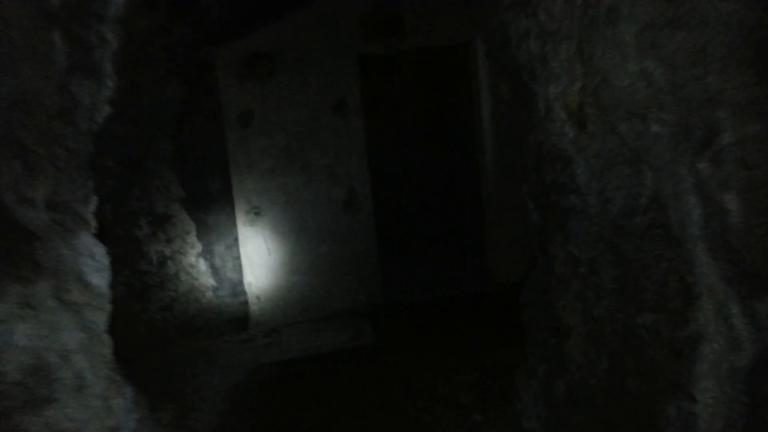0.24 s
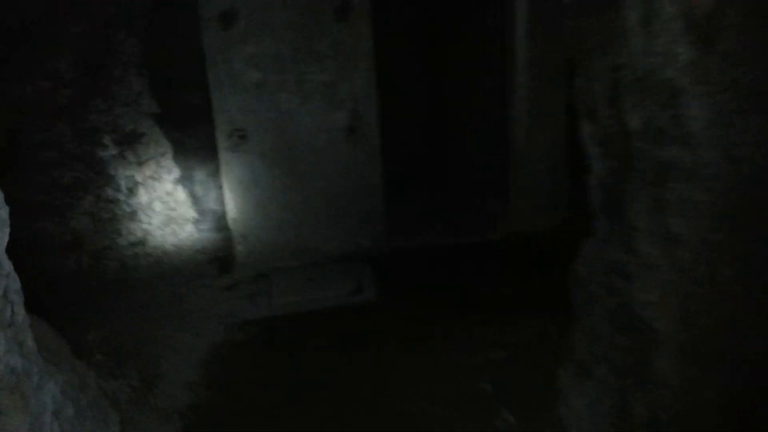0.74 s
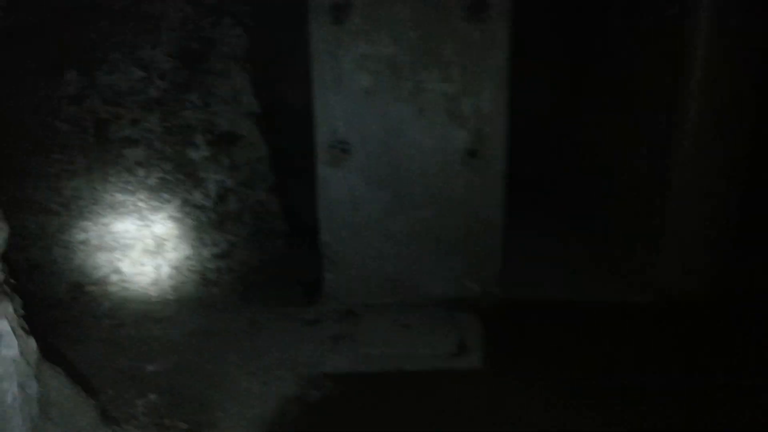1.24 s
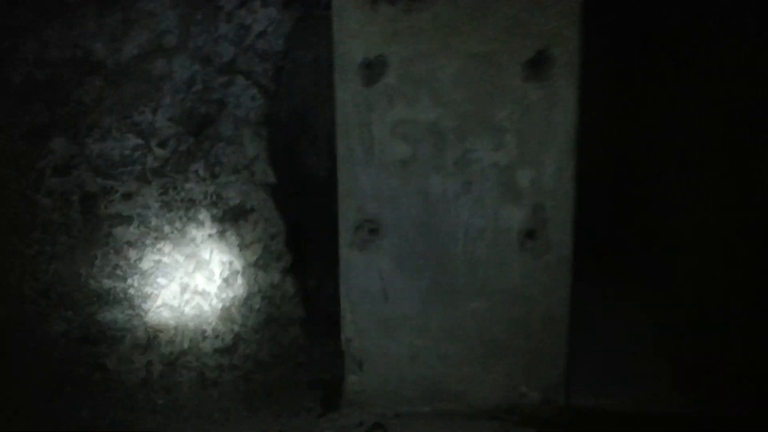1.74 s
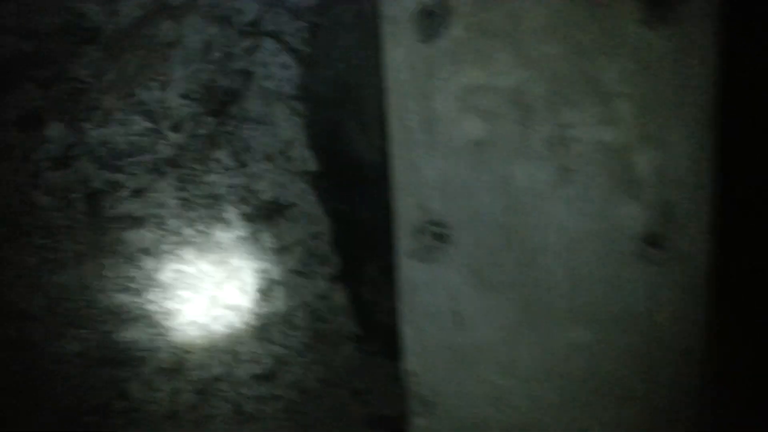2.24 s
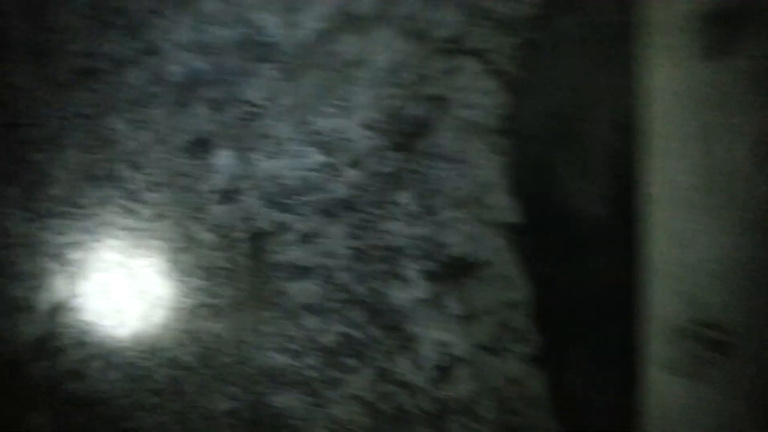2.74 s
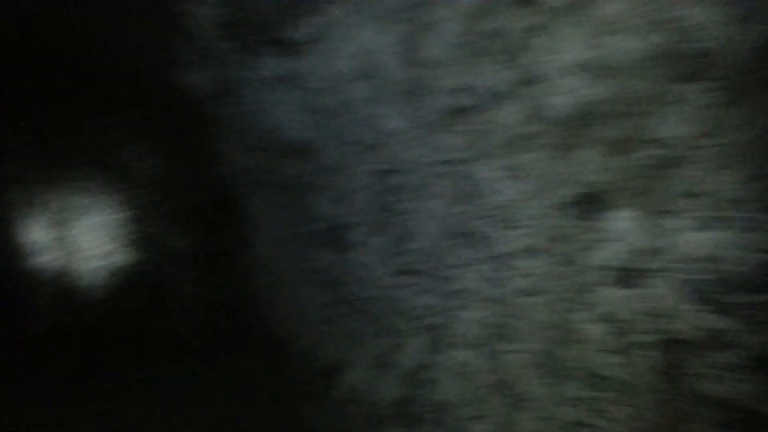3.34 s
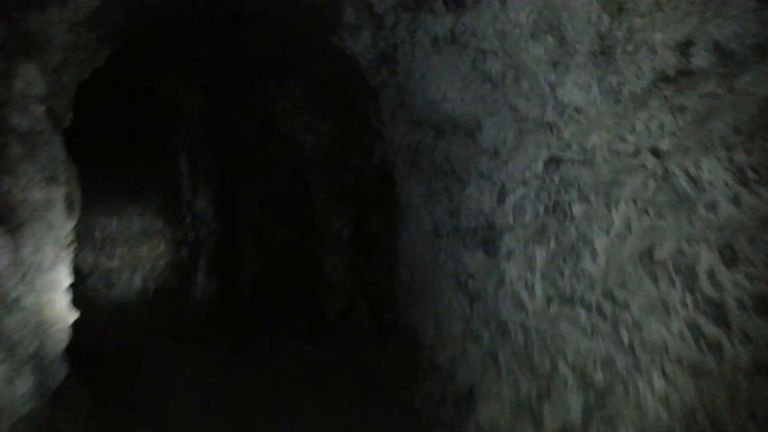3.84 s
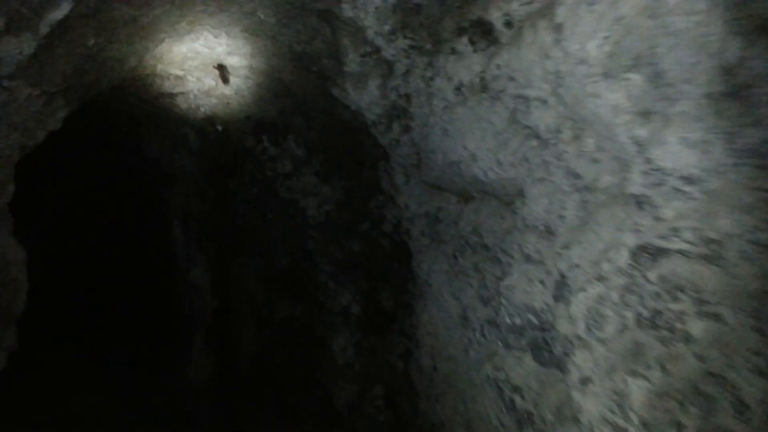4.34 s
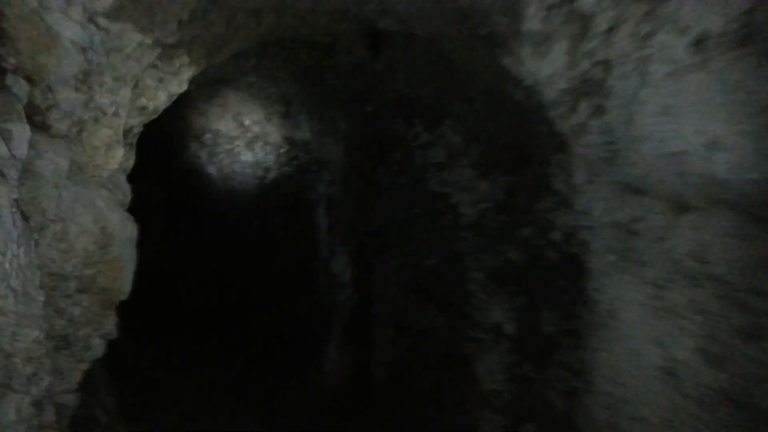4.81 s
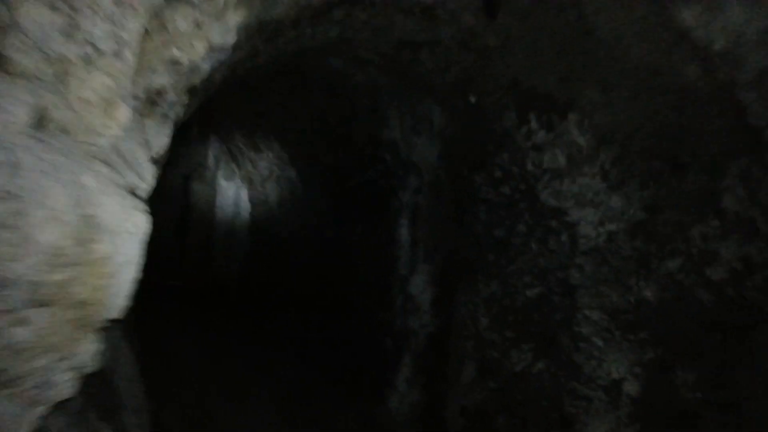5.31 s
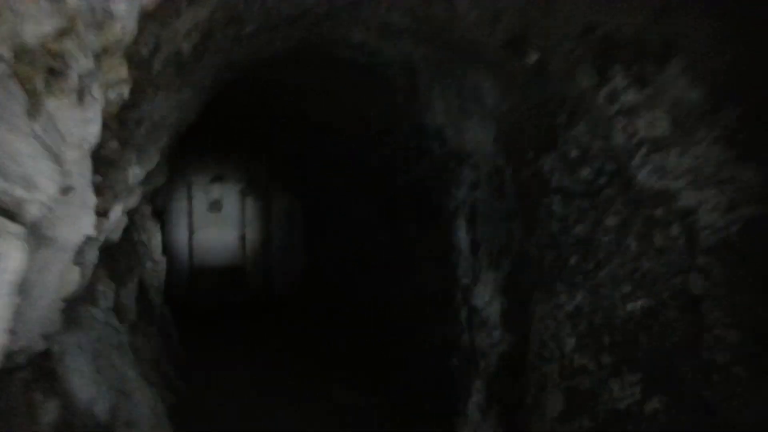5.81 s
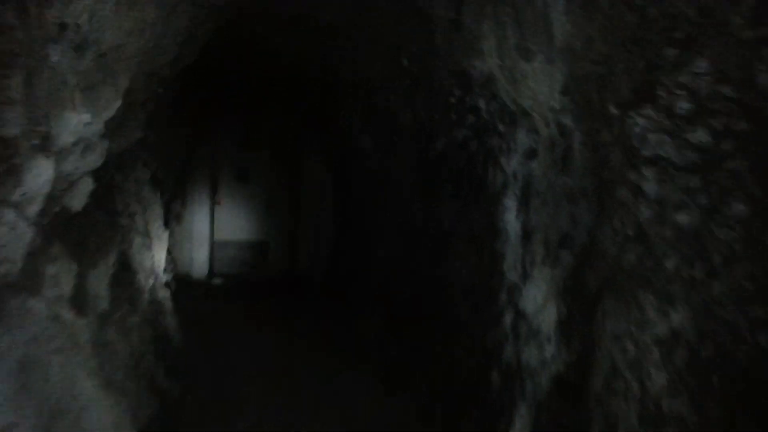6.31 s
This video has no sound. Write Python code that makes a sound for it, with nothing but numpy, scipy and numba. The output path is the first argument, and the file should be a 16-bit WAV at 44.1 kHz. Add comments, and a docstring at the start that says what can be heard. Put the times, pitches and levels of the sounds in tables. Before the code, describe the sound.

Close footsteps crunch over loose stones in a narrow rock tunnel, with heel thuds, sharp pebble knocks and a short dense echo over steady hiss.

```python
"""Footsteps on loose stone, close by: each sole presses rubble, gravel, grit and sand, which crack as dense grains.
Stones and often the heel knock short and hard, heels thud on the rock floor, stray pebbles tick at random.
The place is a narrow rock tunnel: a short dense echo, a longer tail and the hum of its cross modes.
The walker holds a small stereo camera microphone, which adds its colour, hiss, a faint rumble
and two dry handling ticks."""
import sys
import numpy as np
from scipy import signal
from scipy.fft import rfft, irfft, next_fast_len
from scipy.io import wavfile
from numba import njit

SR = 44100
rng = np.random.default_rng(int(sys.argv[2]) if len(sys.argv) > 2 else 0)


def unload_audio(sound):
    """Save the sound as a 16-bit wav file, at the path given as the first command line argument."""
    columns = np.transpose(np.atleast_2d(sound))
    # keep every value between -1 and 1, then stretch to whole-number steps
    steps = np.round(np.clip(columns, -1, 1) * 32767)
    wavfile.write(sys.argv[1], SR, steps.astype(np.int16))


def ratio(d):
    """dB to gain"""
    e = np.asarray(d, float) / 20
    return 10 ** e


N = 289556  # length in samples

# Microphone hiss spectrum before scaling. Each row: frequency in Hz, relative level in dB per Hz.
HISS_SPECTRUM = [(18, -31), (30, -25), (129, 0.5), (312, 4.5), (472, 3.5), (978, -1), (1270, -2.5),
                 (1370, -2.5), (2250, -9), (2840, -3.5), (7630, -16.5), (13500, -18.5), (15000, -23)]
# Colour of the microphone and its body. Each row: frequency in Hz, gain in dB.
MIC_COLOUR = [(30, -36), (110, -10.5), (160, -11.5), (215, -3.1), (450, 6.5), (800, 1.23), (1250, 2),
              (1700, 7.5), (2150, 2.5), (2700, 9.5), (4800, 8.5), (6200, 6), (9000, 3), (12000, 1),
              (14500, -0.5)]
# Mismatch of the two ports. Each row: frequency in Hz, left minus right in dB.
PORT_BALANCE = [(60, -2), (110, 6), (200, 1), (380, 2.5), (700, 0), (1290, 5), (2380, 4), (4400, 2.5),
                (8120, 0), (15000, 4)]
# Decay of the tunnel tail. Each row: frequency in Hz, time to fall 60 dB in seconds.
TAIL_DECAY = [(150, 1), (400, 0.83), (1000, 0.64), (2800, 0.68), (7000, 0.45), (14000, 0.5)]
# Air modes across the tunnel. Each row: mean frequency in Hz, mean level in dB before the tail is scaled,
# time to fall 60 dB in seconds.
CROSS_MODES = [(168, -18.5, 0.49), (215.2, -29.5, 1), (346, -19, 0.62), (443.5, -22.5, 0.2)]

# Stone sizes. Each row: grains per second, lowest pitch in Hz, highest pitch in Hz,
# cycles to fall 20 dB, mean of the random level boost in dB (before its cap).
PEBBLE_GRAINS = (14, 590, 3570, 2.8, 8.2)  # stray pebbles
GRAVEL_GRAINS = (1500, 712, 2303, 5.1, 1.18)
RUBBLE_GRAINS = (1000, 171, 930, 2.5, 4.26)
GRIT_GRAINS = (3000, 1980, 4770, 2.83, 2.2)
SAND_GRAINS = (8000, 6200, 10400, 2, 3.6)

# Heel blows on the rock floor. Each row: start in seconds, level in dB before HEEL_DB,
# pitch in Hz, cycles to fall 20 dB.
HEEL_BLOWS = [(0.332, -17.5, 536, 3.3), (0.862, -18, 436, 12), (1.375, -5.5, 238, 4.7),
              (1.429, 1.5, 232.5, 6.3), (1.812, -14, 229, 4.2), (2.034, -32, 490, 3.7),
              (2.17, -17, 497, 4.3), (2.748, -27, 595, 7.8), (3.239, -35, 315, 10), (3.322, -26, 576, 2.8),
              (3.437, -26, 500, 4.7), (3.845, -27, 440, 4.4), (4.429, -38, 727, 4),
              (4.958, -29.5, 590, 6.9), (5.008, -33, 372, 3.8), (5.208, -23, 251, 20),
              (5.784, -25, 533, 6.6), (6.416, -20, 475, 5.1), (6.449, -17, 500, 5.3)]
# Short hard knocks of stones and, near 710-775 Hz, often of the heel; the two at 4.298 and 5.011 s are
# dry handling ticks close to the microphone. Each row: start in seconds, level in dB, pitch in Hz,
# snap level in dB re the knock, extra level in dB sent to the walls.
HARD_KNOCKS = [(0.189, -22.5, 870, -7.5, 10.5), (0.331, -26, 773, -23, 7), (0.411, -24.5, 740, -13, 10),
               (0.451, -23, 1780, -15, 13), (0.914, -21, 710, -11, 17), (0.976, -8, 1150, -35, 9),
               (1.196, -16, 1950, -15.5, 4), (1.377, -4, 735, -25, 1), (1.413, -20, 1020, -22, 20.5),
               (1.431, 2, 770, -41, -3), (1.491, -16, 710, -13, -9), (1.566, -17.5, 2010, -8, 10.5),
               (1.616, -9.5, 1960, -13, 9), (1.6796, -0.5, 1830, -32, 5), (1.81, -21.5, 2950, -7, 0),
               (2.002, -18, 1800, -39, 12), (2.071, -21.5, 745, -2.5, 12), (2.178, -11.5, 1030, -20, 7.5),
               (2.752, -29.5, 2680, -4, 1.5), (2.788, -19.5, 1790, -16, 5), (2.834, -23.5, 1580, -6.5, 9.5),
               (2.927, -16, 1770, -31, -3), (3.235, -33, 713, -34, 8), (3.324, -28, 727, -18, 9),
               (3.443, -22.5, 1310, -18, 13.5), (3.813, -21.5, 1140, -18.5, 13.5),
               (3.834, -13, 775, -22, 11.5), (3.906, -12, 1090, -27, 6), (4.001, -8.5, 980, -38, 6),
               (4.044, -10.5, 956, -26, 3), (4.298, -19.5, 1850, -20, -3), (4.43, -17, 1080, -20, 13.5),
               (4.556, -24.5, 1090, -18, 7), (4.638, -30.5, 2640, 0, 2), (4.963, -30.5, 836, -28, 10),
               (5.011, -24, 840, -16, -1), (5.115, -30, 1850, -10, 8), (5.209, -28, 880, -16, 1.5),
               (5.781, -22.5, 1750, -4, 10.5), (6.054, -17.5, 1810, -40, -3), (6.315, -36, 900, -17, 12),
               (6.423, -14, 1310, -16, -5), (6.46, -5.5, 1580, -27, -16), (6.517, -22.5, 1640, -14, 15)]
# Modes of a hard knock's contact snap. Each row: frequency in Hz, gain in dB, cycles to fall 20 dB.
SNAP_MODES = [(3150, 8.5, 1.94), (4130, 4, 2.3)]
# A sole lands and presses on. Each row: start in seconds, hold in seconds, gravel level in dB,
# rubble in dB re gravel, sand in dB re gravel; the levels are before TREAD_DB.
SOLE_LANDINGS = [(-0.1, 0.12, -33, 0.5, -19), (0.322, .025, -32.5, -3, -18), (0.852, 0.083, -22.5, 5.5, -7),
                 (1.186, 0.027, -38, 1, -19), (1.365, 0.022, -28.5, 14, -12), (1.437, 0.013, -30, 11, -5),
                 (1.687, .08, -35.5, -6, -25), (2.0, 0.034, -40, -7, -21),
                 (2.744, 0.13, -37.5, -4.5, -13.5), (3.329, 0.066, -36, -3.5, -16),
                 (3.831, 0.084, -33, 5, -8.5), (4.424, 0.033, -38, -6.5, -35), (5.199, 0.024, -41, 8, -18),
                 (5.774, 0.075, -36, -2, -12.5), (6.037, 0.011, -44.5, -14, -13),
                 (6.412, 0.017, -32, -2.5, -15), (6.451, .02, -24.5, -3.5, -19.5)]
# A sole scuffs or rolls off. Each row: peak in seconds, swell in seconds, gravel level in dB,
# rubble in dB re gravel, sand in dB re gravel; the levels are before TREAD_DB.
SOLE_SCUFFS = [(0.12, .08, -37.5, 3, -20.5), (0.191, 0.052, -34, -2, -10.5), (0.27, 0.069, -33.5, -7, -21),
               (0.415, 0.072, -36.5, 0.5, -11), (0.48, 0.085, -35, 2.5, -12),
               (0.55, 0.24, -41.5, 2.5, -11.5), (0.64, 0.035, -46, 8, -10), (1.04, 0.065, -31, -1, -20),
               (1.1, .04, -38, -1, -9.5), (1.16, 0.074, -42.5, 8, -11), (1.55, 0.071, -30, -16, -17),
               (1.631, 0.11, -30, 0.5, -9), (1.82, 0.046, -43.5, 11, 2), (1.965, 0.036, -41, -9, -12.5),
               (2.064, 0.05, -25, -3, -6.5), (2.13, 0.11, -29.5, -3, -12), (2.19, 0.045, -28, -3, -38),
               (2.27, 0.29, -31.5, -4, -15), (2.664, 0.072, -38.5, -15, -11.5), (2.7, .05, -44, -5, -6),
               (2.84, .04, -35, -4, -23), (2.925, 0.052, -40, -3.5, -14), (3.241, 0.021, -44.5, 1.5, -20),
               (3.45, 0.032, -37, 3, -14), (3.68, .04, -52.5, -2, -15), (4.018, 0.13, -26, 2.5, -16),
               (4.126, 0.18, -37.5, 0.5, -7.5), (4.351, 0.11, -43, 2, -6), (4.554, 0.041, -47, -5, -22),
               (4.645, 0.12, -38, 0, -17), (4.738, 0.2, -34.5, -1.5, -11.5), (4.969, 0.026, -58, 16, 5.5),
               (5.124, 0.1, -45.5, -3, -14), (5.27, 0.096, -34, 1.5, -10.5), (5.33, 0.085, -41.5, 6, -13),
               (5.77, 0.12, -47, 1, -15), (5.875, 0.044, -33.5, 1.5, -11.5), (5.929, 0.095, -36.5, -1, -13),
               (6.17, 0.026, -55, 5, 4.5), (6.32, .04, -51, 6, -7), (6.405, .05, -44, -3, -9),
               (6.515, .04, -34.5, 5, -15)]
# How gravel, rubble, grit and sand, in this order, fall quiet after a press [amplitude, dB per second].
SETTLE_RATES = (180, 139, 201, 242)

HISS_DB, RUMBLE_DB = -45.5, -75  # rms at the capsules
EARLY_DB, EARLY_T60_S, WALL_S = -0.7, 0.1, 0.002  # nothing returns before WALL_S
TAIL_DB, TAIL_BUILD_S = -4.5, 0.08  # tail level before its gradual build-up
ALIKE_HZ = 626  # above this the two ports hear unrelated echoes
STRIDE_S = 0.45
LARGEST_DB = 12  # cap on a grain's random level boost
PORT_LAG_S = 0.00025  # largest lag between the ports
PEBBLE_DB, HEEL_DB, TREAD_DB = -65, -5, -4  # levels on the floor, which also drive the echo
KNOCK_CYCLES = 2.26  # cycles in which a hard knock falls 20 dB
OVERTONE, OVERTONE_DB = 1.385, -7.5  # a hard knock's second mode re its first
LANDING_RISE_S, SWELL_DB = 0.0042, 17  # a scuff climbs SWELL_DB in its swell time
GRIT_DB, GRIT_SHARE = 0, 0.41  # grit dB re gravel = GRIT_DB + GRIT_SHARE * sand dB
SLIP_HZ, SLIP_DB = 163, 1.24  # fastest stick-slip of the sole, rms swing of its level
TOP_HZ = 14600


def colour(x, points):
    """Weights the spectrum by (Hz, dB) points."""
    size = next_fast_len(x.shape[-1])
    hz, db = np.transpose(points)
    bins_hz = np.arange(size // 2 + 1) * SR / size
    gain = ratio(np.interp(np.log(bins_hz + 1), np.log(hz), db))
    return irfft(rfft(x, size) * gain, size)[..., :x.shape[-1]]


def unit(x):
    """Scales to rms 1."""
    return x / np.sqrt(np.mean(x ** 2))


def filtered(x, order, hz, kind):
    """Butterworth filter of the given kind."""
    return signal.sosfilt(signal.butter(order, hz, kind, fs=SR, output="sos"), x)


def wide_noise(size, alike_hz):
    """Two-channel noise, the same in the bass and unrelated in the treble."""
    mid, side = rng.standard_normal((2, size))
    side = filtered(side, 2, alike_hz, "high")
    return mid + side * np.array([[1], [-1]])


@njit
def ring(size, start, hz, cycles, gain, rise):
    """Sums damped sines that swell over a part of a cycle and fall 60 dB in three times their cycles."""
    out = np.zeros((2, size))
    for k in range(len(hz)):
        length = 3 * cycles[k] * SR / hz[k]
        turn = np.exp(2j * np.pi * hz[k] / SR - np.log(1000) / length)
        soften = np.exp(-hz[k] / SR / rise)
        for c in range(2):
            z, soft = gain[c, k] + 0j, 1.
            # cut off once 36 dB down
            for i in range(max(start[c, k], 0), min(start[c, k] + int(.6 * length), size)):
                out[c, i] += z.imag * (1 - soft)
                z, soft = z * turn, soft * soften
    return out


def knock(s, db, hz, cycles, pan_db, lag_s):
    """Places knocks, each reaching the two ports with its own lag and balance."""
    start = (np.array([s + lag_s / 2, s - lag_s / 2]) * SR).astype(np.int64)
    gain = ratio(db + np.array([pan_db, -pan_db]) / 2)
    return ring(N, start, 1. * hz, np.maximum(cycles, 1.), gain, 0.47)


def loose(rate, low_hz, high_hz, cycles, scatter_db):
    """A steady shower of grains of random pitch, a few larger than the rest, at rms 1."""
    when, pitch, largeness, place = rng.random((int(rate * N / SR), 4)).T
    hz = low_hz * (high_hz / low_hz) ** pitch
    boost_db = np.minimum(-scatter_db * np.log(1 - largeness), LARGEST_DB)
    db = boost_db + 6.3 * np.log10(hz)
    side = 2 * place - 1
    return unit(knock(when * N / SR, db, hz, cycles + 0 * hz, 3 * side, PORT_LAG_S * side))


def hiss():
    """Air noise, alike at both ports in the bass, over each capsule's own rumble."""
    air = unit(colour(wide_noise(N, 330), HISS_SPECTRUM)) * ratio(HISS_DB)
    rumble = filtered(rng.standard_normal((2, N)), 2, (30, 70), "band")
    return air + unit(rumble) * ratio(RUMBLE_DB)


def cross_modes(t):
    """Air resonating across the tunnel; its width varies, so modes shift a little and swell or shrink."""
    width = 1 + 0.01954 * rng.standard_normal()
    swell = rng.standard_normal(len(CROSS_MODES))
    modes = 0
    for (hz, db, t60), v in zip(CROSS_MODES, swell):
        modes = modes + ratio(db + 2.64 * v - 60 * t / t60) * np.sin(2 * np.pi * hz * width * t)
    return modes


def echo(size):
    """One spot's answer to a click: rough walls scatter a quick dense echo, the length gives a tail."""
    t = np.arange(size) / SR
    early = unit(wide_noise(size, ALIKE_HZ) * ratio(-60 * t / EARLY_T60_S)) * ratio(EARLY_DB)
    noise = wide_noise(size, ALIKE_HZ)
    hz, t60 = np.transpose(TAIL_DECAY)
    tail, edges = 0, 80 * 2 ** np.arange(0, 8.01, 1)  # octave bands
    for low, high in zip(edges[:-1], edges[1:]):
        band_t60 = np.interp(np.log(low * high) / 2, np.log(hz), t60)
        tail = tail + filtered(noise, 2, (low, high), "band") * ratio(-60 * t / band_t60)
    tail = unit(tail + cross_modes(t)) * ratio(TAIL_DB) * (1 - np.exp(-t / TAIL_BUILD_S))
    return (early + tail) * (t > WALL_S) / np.sqrt(size)


def tunnel(x):
    """The walker moves on, so each stride is echoed by a new spot, faded at equal power."""
    hop, size = int(STRIDE_S * SR), SR
    mono = np.pad(x.mean(axis=0), (hop, 2 * hop))
    out = np.zeros((2, N + 3 * hop + size))
    fade = np.sin(np.pi * np.arange(2 * hop) / (2 * hop))
    for i in range(0, N + hop, hop):
        stride = (mono[i:i + 2 * hop] * fade)[None]
        out[:, i:i + 2 * hop + size - 1] += signal.fftconvolve(stride, echo(size), axes=1)
    return out[:, hop:hop + N]


def pebbles():
    """Pebbles disturbed by the walker roll and tick now and then, also between steps."""
    return loose(*PEBBLE_GRAINS) * ratio(PEBBLE_DB)


def heels():
    """Dull blows of the heel: one damped mode each."""
    s, db, hz, cycles = np.transpose(HEEL_BLOWS)
    return knock(s, db, hz, cycles, 0 * s, 0 * s)


def hard_knocks(extra_db):
    """Each hard knock or handling tick rings briefly in two modes and snaps at contact."""
    s, db, hz, snap_db, _ = np.transpose(HARD_KNOCKS)
    db, zero = db + extra_db, 0 * s
    snap = 0
    for mode_hz, mode_db, cycles in SNAP_MODES:
        snap = snap + knock(s, db + snap_db + mode_db, mode_hz + zero, cycles + zero, zero, zero)
    first = knock(s, db, hz, KNOCK_CYCLES + zero, 0.87 + zero, zero)  # slightly to the left
    second = knock(s, db + OVERTONE_DB, OVERTONE * hz, KNOCK_CYCLES + zero, zero, zero)
    return first + second + snap


def knocks_near_and_at_walls():
    """The direct hard knocks and what of them reaches the walls."""
    wall_extra_db = np.transpose(HARD_KNOCKS)[-1]
    return hard_knocks(0), hard_knocks(wall_extra_db)


def pressing(size):
    """Loudness over time of one size (0 gravel, 1 rubble, 2 grit, 3 sand): every press adds its power."""
    t, power = np.arange(0, N / SR, .001), 0
    presses = []
    for row in SOLE_LANDINGS:
        start_s, hold_s = row[:2]
        rise = np.clip((t - start_s) / LANDING_RISE_S, 0, 1) ** 2
        presses.append((row, rise, start_s + hold_s))
    for row in SOLE_SCUFFS:
        peak_s, swell_s = row[:2]
        rise = ratio(SWELL_DB * np.minimum(t - peak_s, 0) / swell_s)
        presses.append((row, rise, peak_s))
    for (_, _, gravel_db, rubble_db, sand_db), rise, lift_s in presses:
        grit_db = GRIT_DB + GRIT_SHARE * sand_db
        db = gravel_db + (0, rubble_db, grit_db, sand_db)[size]
        settle_db = SETTLE_RATES[size] * np.maximum(t - lift_s, 0)
        power = power + (rise * ratio(db - settle_db)) ** 2
    return np.interp(np.arange(N) / SR, t, np.sqrt(power))


def footfalls():
    """The sole's pressure sets how loud each size cracks; it sticks and slips, so grains come in clumps."""
    showers = [loose(*grains) for grains in (GRAVEL_GRAINS, RUBBLE_GRAINS, GRIT_GRAINS, SAND_GRAINS)]
    slip = unit(filtered(rng.standard_normal(N), 2, (SLIP_HZ / 3, SLIP_HZ), "band"))
    pressed = sum(shower * pressing(size) for size, shower in enumerate(showers))
    return pressed * ratio(SLIP_DB * slip)


def scene():
    """Feet and hard knocks, their echo in the tunnel, the microphone's colour and the hiss."""
    tread = ratio(TREAD_DB) * footfalls() + ratio(HEEL_DB) * heels() + pebbles()
    near_knocks, wall_knocks = knocks_near_and_at_walls()
    echoes = tunnel(tread + wall_knocks)
    return colour(tread + near_knocks + echoes, MIC_COLOUR) + hiss()


def band_limit(x):
    """A steep low-pass at the top of the band."""
    return signal.sosfilt(signal.butter(12, 15730, fs=SR, output="sos"), x)


def record(dry):
    """The two ports differ in colour, the top is cut steeply and the converter clips."""
    ports = []
    for channel, sign in zip(dry, (1, -1)):
        half_balance = [(hz, sign * db / 2) for hz, db in PORT_BALANCE]
        ports.append(colour(channel, half_balance))
    top_cut = signal.ellip(8, .2, 60, TOP_HZ, fs=SR, output="sos")  # 0.2 dB ripple, 60 dB stopband
    mix = np.clip(signal.sosfilt(top_cut, np.array(ports)), -1, 1)
    return band_limit(mix)


dry = scene()
out = record(dry)
unload_audio(out)
```